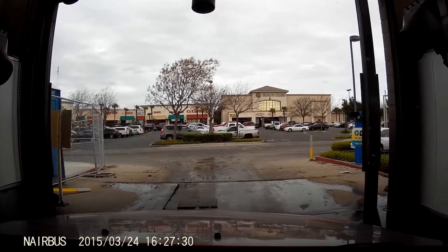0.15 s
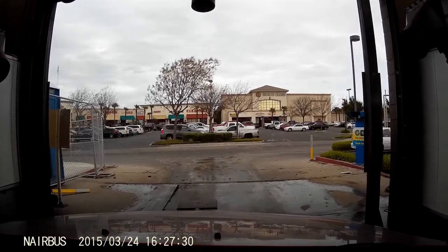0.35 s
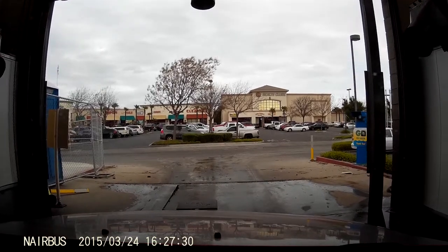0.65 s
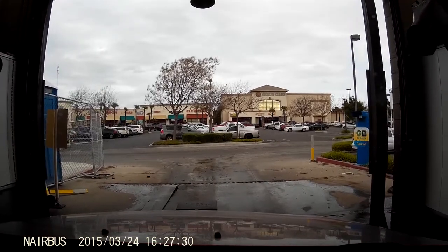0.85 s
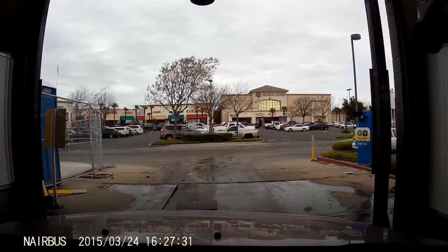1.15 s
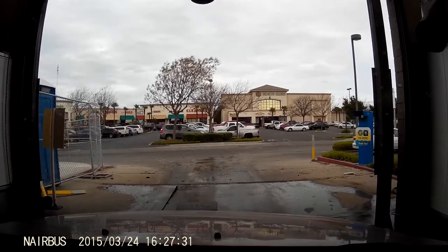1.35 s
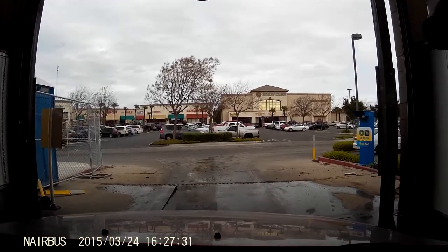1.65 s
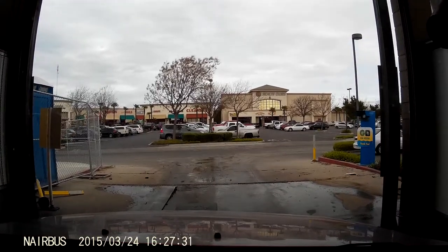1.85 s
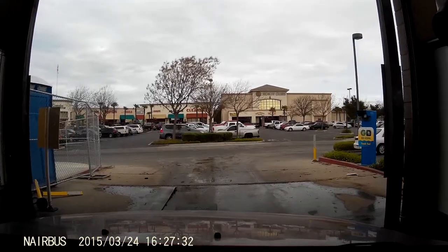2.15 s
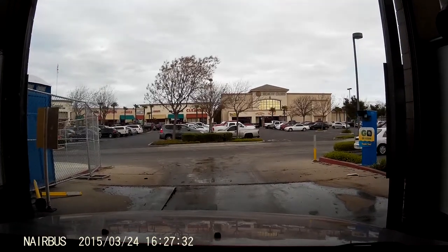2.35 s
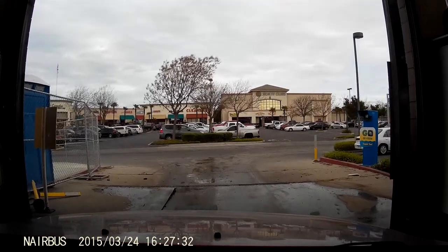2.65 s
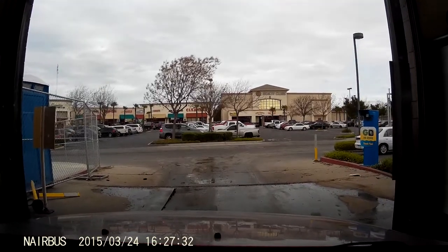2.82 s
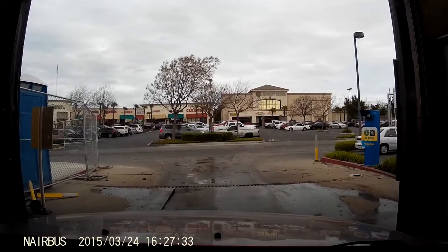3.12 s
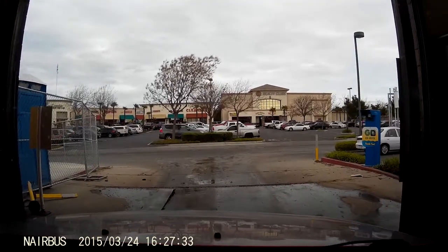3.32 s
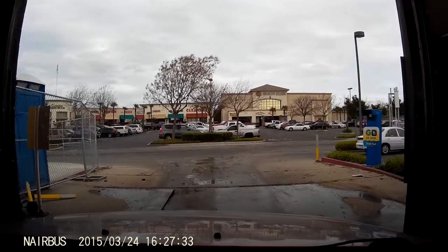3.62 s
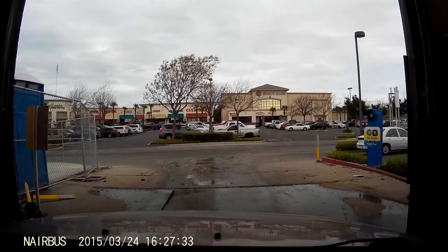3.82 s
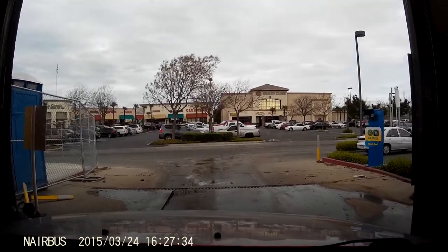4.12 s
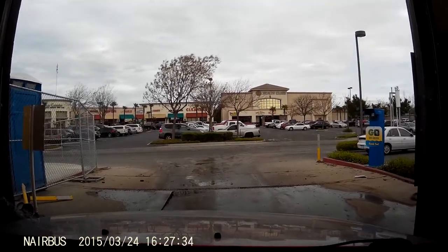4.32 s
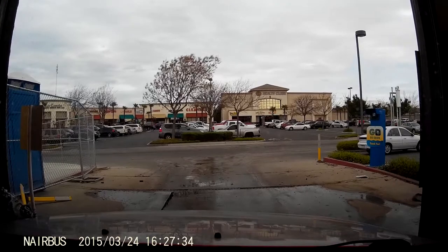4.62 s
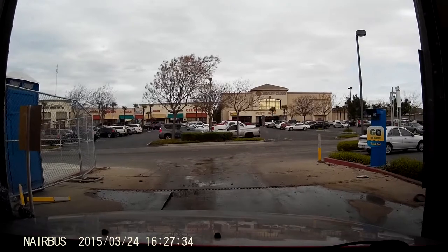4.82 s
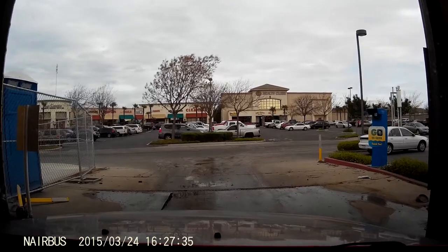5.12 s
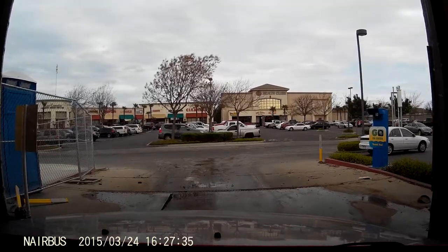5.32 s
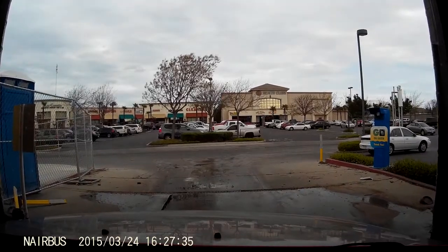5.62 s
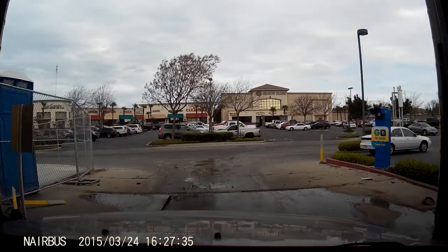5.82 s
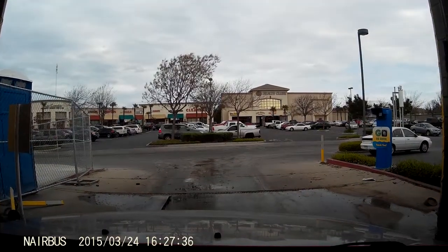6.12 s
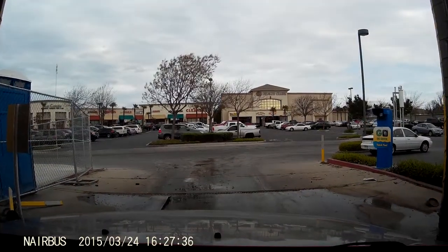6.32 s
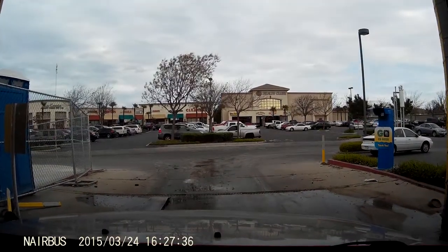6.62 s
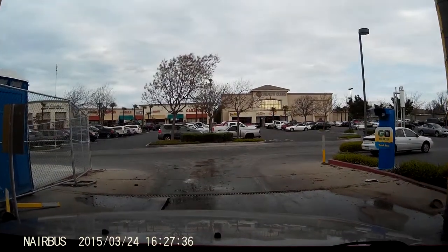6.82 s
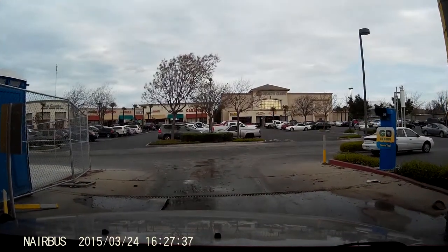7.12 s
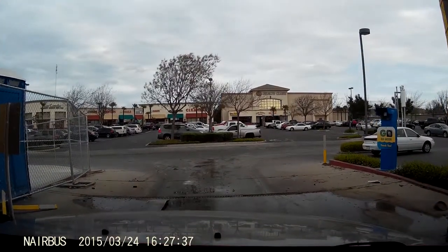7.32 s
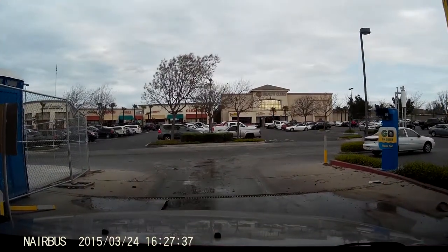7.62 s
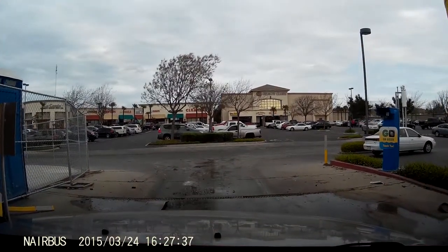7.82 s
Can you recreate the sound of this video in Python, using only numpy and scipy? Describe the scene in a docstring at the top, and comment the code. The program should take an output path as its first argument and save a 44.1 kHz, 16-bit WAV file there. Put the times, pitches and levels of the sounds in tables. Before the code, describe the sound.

One microphone inside a closed car moving slowly out beneath car wash dryers. From 0 to 8 seconds a loud, unbroken roar of turbulent air surrounds the cabin: low body rumble, boxy cabin boom, a midrange roar with a slight blower hum, and weaker fluttering hiss at the glass. It begins boomy and roaring, eases after about 1.4 seconds, dips near 6.1, then becomes more rumbling, with a short surge around 7.6. Close by, loose plastic chatters in fast, dry tick trains: frequent from 0.2 to 1 second, sparse until 3.2, clustered around 3.5, then dense from 4.9 to 6.2. The hardest tick, at 5.95, adds a small low knock. A few bursts return at 7.0, 7.5 and the end. A faint, thin, buzzy high electronic whine lies beneath throughout, slightly clearer from 2.3 to 4 seconds.

```python
"""The roar of blowers fills a car under a car wash dryer, heard from one microphone inside.
The jets buffet the body shell, boom in the cabin and hiss along the glass: shaped random noise whose
levels follow the gusts and a drifting balance of tone. A loose plastic part near the microphone
chatters in bursts, as trains of ticks ringing short modes; its hardest tick also knocks the mount.
The camera electronics whine faintly: a tone whose sign keeps flipping."""
import sys
import numpy as np
from scipy import signal
from scipy.io import wavfile
from scipy.ndimage import uniform_filter1d, minimum_filter1d

SR = 44100
rng = np.random.default_rng(int(sys.argv[2]) if len(sys.argv) > 2 else 0)


def unload_audio(sound):
    """Save the sound as a 16-bit wav file, at the path given as the first command line argument."""
    columns = np.transpose(np.atleast_2d(sound))
    # keep every value between -1 and 1, then stretch to whole-number steps
    steps = np.round(np.clip(columns, -1, 1) * 32767)
    wavfile.write(sys.argv[1], SR, steps.astype(np.int16))


def volts(x):
    """Linear amplitude factor 10**(x/20) for a level x in dB, scalar or array-like."""
    e = np.asarray(x, float) / 20
    return 10 ** e


N = 351036  # samples, about 8 s

# Singly placed ticks of the loose part, many of them inside bursts.
# Each row: time in seconds, strength in dB before ringing.
SINGLE_TICKS = [(.2788, -27), (.5843, -30), (.6322, -26), (.7671, -30), (.7792, -31), (1.0106, -40),
                (1.04, -40), (1.3796, -40), (1.6635, -33), (2.3361, -37), (2.6996, -38), (2.9698, -37),
                (3.0816, -36), (3.2139, -35), (3.3009, -40), (3.4624, -29), (3.7146, -39), (3.8983, -39),
                (4.4542, -34), (4.5638, -30), (4.6217, -32), (4.7709, -34), (4.9297, -27), (5.1711, -26),
                (5.1886, -28), (5.4575, -27), (5.5731, -27), (5.5828, -27), (5.675, -30), (5.8111, -34),
                (5.9474, -20.5), (6.0434, -30), (6.0581, -33), (6.2642, -36), (6.4162, -36), (6.5487, -41),
                (6.8103, -40), (7.2695, -37), (7.3865, -36)]


def evened(x):
    """Scales a signal to rms 1."""
    return x / np.sqrt(np.mean(x ** 2) + 1e-20)


def air(spectrum, patchy_db, flicker_db, size=2048):
    """Turbulence as random short-time spectra with drifting patches and a flicker shared by all frequencies."""
    hop = size // 4
    frames = N // hop + 5
    hz = np.fft.rfftfreq(size, 1 / SR)
    real, imaginary, patches = rng.standard_normal((frames, len(hz), 3)).T
    patches = uniform_filter1d(patches, size=12, axis=0)  # across frequency
    patches = evened(uniform_filter1d(patches, size=8, axis=1))  # across time
    flicker = evened(uniform_filter1d(rng.standard_normal(frames), size=3))
    point_hz, point_db = np.transpose(spectrum)
    colour_db = np.interp(np.log(hz + 1), np.log(point_hz + 1), point_db, left=-120, right=-120)
    swing_db = patchy_db * patches + flicker_db * flicker
    spectra = (real + 1j * imaginary) * volts(colour_db[:, None] + swing_db)
    noise = signal.istft(spectra, nperseg=size, noverlap=size - hop)[1]
    return evened(noise[:N])


def jet_gain(rule):
    """Each part of the blower noise is loudest at one balance of tone and swings with the blast."""
    # Gusts and the drifting tone of the blower noise. Each row: time in seconds, blast in dB,
    # balance from boomy and roaring (low) to rumbling (high).
    gusts = [(0, -0.37, 2), (.15, 1.3, 1.64), (1.4, -0.98, 2.5), (1.9, -0.55, 2.15), (2.44, -0.32, 2.85),
             (3.5, 0, 3.2), (4.63, 0.28, 3.4), (5.3, -0.55, 2.83), (5.5, 0.38, 2.33), (5.85, -1, 3.16),
             (5.96, -0.34, 2.8), (6.12, -2.14, 2.86), (6.85, 0.97, 3.96), (7.43, 0.12, 4.03),
             (7.65, 3.4, 4.61), (7.76, 0.41, 4.42), (7.96, -0.83, 3.8)]
    s, blast_db, balance = np.transpose(gusts)
    t = np.arange(N) / SR
    blast_db = np.interp(t, s, blast_db)
    balance = np.interp(t, s, balance)
    loudest_db, best_balance, loss_db, share = rule
    return volts(loudest_db - loss_db * (balance - best_balance) ** 2 + share * blast_db)


def roar():
    """Middle band of the jets, with a blower hum near 355 Hz."""
    # Each row: frequency in Hz, relative density in dB per Hz.
    roar_spectrum = [(140, -23.5), (230, -0.5), (264, -6), (325, -1.5), (343, -3.5), (356, 1.5),
                     (370, -0.5), (390, -3.5), (430, -4.5), (520, -7.5), (625, -8), (640, -9), (655, -8.5),
                     (680, -10.5), (780, -19.5), (1010, -52), (1720, -120)]
    # In order: level in dB at its best balance with no blast swing, best balance,
    # loss in dB per squared step of balance, share of the blast swings.
    roar_rule = (-22.5, 2.5, 2.45, 2.07)
    return jet_gain(roar_rule) * air(roar_spectrum, 0.25, 0.12, size=4096)


def buffet():
    """Large eddies pump the body panels: a deep rumble."""
    # Each row: frequency in Hz, relative density in dB per Hz.
    buffet_spectrum = [(10, -30), (20, -15), (28, -2.5), (38, 2.5), (52, .5), (63, 3.5), (72, 0),
                       (95, -2.5), (125, -3), (200, -98)]
    # In order: level in dB at its best balance with no blast swing, best balance,
    # loss in dB per squared step of balance, share of the blast swings.
    buffet_rule = (-19, 4, 1.84, 0.65)
    return jet_gain(buffet_rule) * air(buffet_spectrum, 0.3, 0.046, size=8192)


def boom():
    """Noise gathered around the air modes of the cabin."""
    # Each row: frequency in Hz, relative density in dB per Hz.
    boom_spectrum = [(50, -40), (85, -16.5), (124, 4), (150, 3), (172, 3), (200, 2.5), (228, -4),
                     (250, -10.5), (320, -30), (550, -120)]
    # In order: level in dB at its best balance with no blast swing, best balance,
    # loss in dB per squared step of balance, share of the blast swings.
    boom_rule = (-21, 2, 0.63, 0.46)
    return jet_gain(boom_rule) * air(boom_spectrum, 0.1, 0.082, size=4096)


def hiss():
    """Jets along the glass, through glass and door seals: a brighter, livelier noise."""
    # Each row: frequency in Hz, relative density in dB per Hz.
    hiss_spectrum = [(430, -65), (730, -7.5), (814, -5.5), (954, -2), (1180, -5), (1310, -3.5),
                     (1720, -16.5), (2270, -12), (2920, -19.5), (3210, -13.5), (3450, -22.5), (4100, -31),
                     (5330, -32), (9020, -120)]
    # In order: level in dB at its best balance with no blast swing, best balance,
    # loss in dB per squared step of balance, share of the blast swings.
    hiss_rule = (-33, 3, 3.5, 2.4)
    return jet_gain(hiss_rule) * air(hiss_spectrum, 0.79, 0.53, size=1024)


def ring(hz, db, t60):
    """One decaying mode, 2000 samples long."""
    t = np.arange(2000) / SR
    return volts(db - 60 * t / t60) * np.sin(2 * np.pi * hz * t)


def clear_ticks(count=40):
    """The loose part bounces on in bursts, uneven trains of contacts; the singly placed ticks are added."""
    # Each row: start in seconds, length in seconds, tick strength in dB before ringing,
    # typical gap between ticks in seconds.
    burst_table = [(.1919, .017, -34.5, .0052), (.2501, .037, -34.5, .005), (.3389, .04, -41, 0.0057),
                   (.4236, .064, -36.5, .0048), (.5457, .047, -36.5, 0.0052), (.7026, .042, -38, 0.0057),
                   (0.758, .072, -40, .0056), (.9142, .028, -39.5, .0055), (0.954, .005, -33, 0.0039),
                   (1.9373, .005, -34, .004), (1.9708, .06, -35, 0.0093), (2.1409, .005, -35, .004),
                   (3.2517, .023, -39, .007), (3.4531, .023, -36, .0043), (3.4974, .016, -37.5, .0047),
                   (3.5906, .033, -33.5, .0052), (3.6494, .023, -34.5, .006), (4.1349, .023, -37, .0052),
                   (4.5359, .05, -39, .006), (4.894, .057, -34, .0055), (5.0085, .017, -36, .005),
                   (5.045, .028, -45, 0.0046), (5.0761, .124, -32.5, .0072), (5.2173, .013, -34, .0115),
                   (5.2579, .016, -33.5, .007), (5.3286, .035, -31, .0055), (5.385, .045, -40.5, .006),
                   (5.4715, .115, -31.5, 0.0052), (5.5905, .025, -36, 0.0067), (5.6548, .043, -37, .0058),
                   (5.937, .04, -35, 0.0057), (5.9807, .017, -29.5, .0078), (5.996, .075, -42, .0055),
                   (6.1284, .022, -34, .0066), (6.166, .075, -41, .0064), (6.9678, .03, -34, .007),
                   (7.522, .043, -35, .006), (7.5833, .11, -35, .0056), (7.8853, .014, -35, .0062),
                   (7.9398, .011, -32, .01)]
    gap_spread, tick_spread_db = 0.16, 2.0  # spread of log gap, spread of strength
    start, length, tick_db, gap = np.transpose(burst_table)[:, :, None]
    timing, strength = rng.standard_normal((2, len(burst_table), count))
    gaps = gap * np.exp(gap_spread * timing)
    since = np.cumsum(gaps, axis=1) - gaps[:, :1]  # the first tick falls on the start
    inside = since < length
    burst_s = (start + since)[inside]
    burst_db = (tick_db + tick_spread_db * strength)[inside]
    single_s, single_db = np.transpose(SINGLE_TICKS)
    s = np.append(burst_s, single_s)
    strength_db = np.append(burst_db, single_db)
    clear = np.zeros(N)
    clear[np.minimum(np.round(s * SR).astype(int), N - 1)] = volts(np.minimum(strength_db, 0))
    return clear


def chatter(clear):
    """Small near-regular bounces around the clear ticks."""
    rate_per_s, relative_db = 230, -12  # centre rate; centre strength relative to the capped clear tick
    # shaking outlasts each clear tick: the two signs make a running maximum
    busy = -minimum_filter1d(-np.minimum(clear, 0.03), size=1000, origin=300)
    # no bounce while the part is thrown clear
    busy *= minimum_filter1d(1.0 * (clear == 0), size=240)
    wander = evened(uniform_filter1d(rng.standard_normal(N), size=200))
    beat = np.cumsum(rate_per_s / SR * volts(2.7 * wander))
    contacts = np.diff(np.floor(beat), prepend=0)  # one at each whole beat
    return contacts * volts(relative_db + 3.0 * rng.standard_normal(N)) * busy


def stray_ticks():
    """Faint ticks at random times, in clumps, independent of the bursts."""
    rate_per_s, floor_db = 45, -52.5  # rate before clumping; weakest strength before ringing
    unrest = volts(4.9 * evened(uniform_filter1d(rng.standard_normal(N), size=2500)))
    contacts = rng.random(N) < unrest * rate_per_s / SR
    return contacts * volts(floor_db + 3.3 * np.minimum(rng.exponential(1, N), 2.5))


def rattle():
    """Contacts and their scrapes ring the plastic; each contact weighs the modes anew."""
    # What each tick rings with. Each row: frequency in Hz, relative level in dB, t60 in seconds.
    plastic_modes = [(2770, -10, 0.0059), (3704, -12, 0.016), (4270, -9.5, 0.0094), (5190, 0, 0.0054),
                     (5630, 3, 0.0046), (5560, 3, 0.0041), (6660, -9, 0.011), (7570, -6.5, 0.0049),
                     (8850, -4.5, 0.0048), (9800, -9.5, 0.0047), (11260, -5.5, 0.0064), (12800, 2, 0.0015)]
    clear = clear_ticks()
    blows = clear + chatter(clear) + stray_ticks()
    # each blow skids for a moment: a scrape dying by 60 dB in 8 ms
    skid_decay = np.exp(-np.log(1000) / (0.008 * SR))
    skid = signal.lfilter([1], [1, -skid_decay], blows)
    scrape = skid * volts(-23.5) * rng.standard_normal(N)
    squareness = volts(2.5 * rng.standard_normal(N))  # some contacts land square, some glance
    hardness = np.clip(squareness * blows / 0.052, 0.01, 3.2)
    weights = rng.standard_normal((len(plastic_modes), N))
    rung = np.zeros(N)
    for k, (weight, (hz, db, t60)) in enumerate(zip(weights, plastic_modes)):
        brightness = hardness ** (0.95 * np.log2(hz / 5200))  # harder blows are shorter, so brighter
        struck = blows * brightness * (-1) ** k * (0.8 + 0.16 * weight)
        scraped = scrape * (5200 / hz) ** 0.82  # the scrape is dull
        rung += signal.oaconvolve(struck + scraped, ring(hz, db, t60))[:N]
    high_pass = signal.butter(4, 2300, "high", fs=SR, output="sos")
    return volts(2.0) * signal.sosfilt(high_pass, rung)


def knock():
    """The hardest tick also rings the mount, lower and longer than the plastic."""
    # Each row: frequency in Hz, level in dB, t60 in seconds.
    mount_modes = [(434, -10.5, 0.054), (1000, -20, .025), (1220, -16.5, .025)]
    hardest_s = max(SINGLE_TICKS, key=lambda row: row[1])[0]
    out = np.zeros(N)
    out[round(hardest_s * SR):][:2000] = sum(ring(*mode) for mode in mount_modes)
    return out


def whine():
    """Camera electronics: a thin tone with regular sign flips, so its lines stand about 60 Hz apart."""
    # In order: tone in Hz, full sign cycles a second, nominal rms level in dB before the drift.
    whine_tone = 7932.7, 30.25, -66.3
    # The whine swells and fades. Each row: time in seconds, change in dB.
    whine_drift = [(0, -.5), (1.8, -1), (2.3, 2.5), (3.8, 2), (5.4, 0), (6.2, -1), (7.96, -3.5)]
    hz, cycles_per_s, db = whine_tone
    t = np.arange(N) / SR
    sign = np.tanh(12 * np.sin(2 * np.pi * (cycles_per_s * t + rng.random())))
    level = np.sqrt(2) * volts(db + np.interp(t, *np.transpose(whine_drift)))
    return level * sign * np.sin(2 * np.pi * hz * t)


def faint_top():
    """The faint top of the air noise and the microphone noise, at a level the gusts do not move."""
    # Each row: frequency in Hz, relative density in dB per Hz.
    top_spectrum = [(3300, -25), (3900, -19), (4500, -15), (4850, 7), (5200, -29), (6100, -1), (7100, -5),
                    (8400, -7), (10400, -10), (11500, -9.5), (13500, -12), (13750, -45), (15000, -70)]
    return volts(-61.5) * air(top_spectrum, 1.1, 0.7, size=512)


def scene():
    """All sources at the one microphone in the cabin."""
    blowers = roar() + buffet() + boom() + hiss()
    loose_part = rattle() + knock()
    return (blowers + loose_part + whine() + faint_top())[None]


def low_pass(x):
    """Removes everything above the highest recorded frequency."""
    return signal.sosfilt(signal.butter(12, 14780, fs=SR, output="sos"), x)


def record(dry):
    """The camera's steep anti-alias filter cuts the treble above 13.9 kHz."""
    anti_alias = signal.cheby1(8, 0.5, 13900, fs=SR, output="sos")
    limited = signal.sosfilt(anti_alias, dry)
    return low_pass(limited)


dry = scene()
out = record(dry)
unload_audio(out)
```